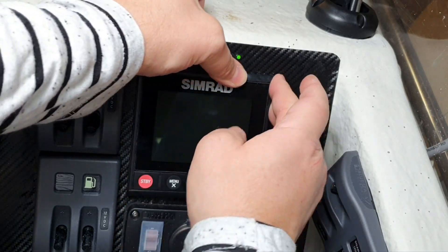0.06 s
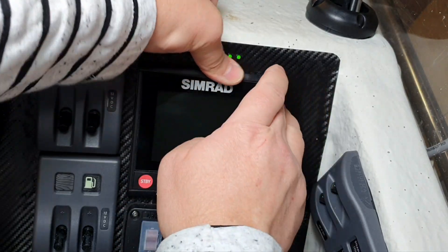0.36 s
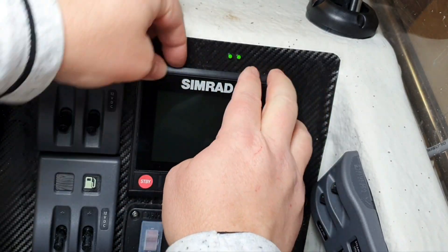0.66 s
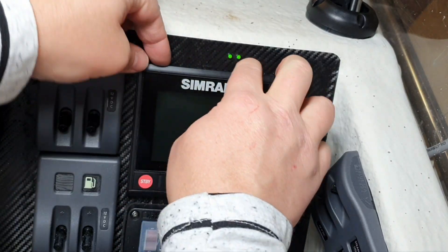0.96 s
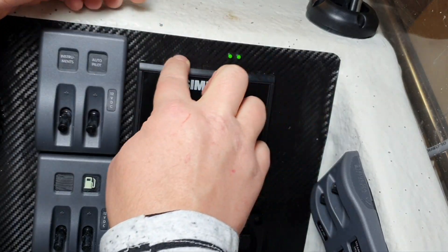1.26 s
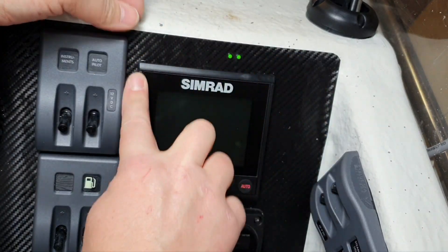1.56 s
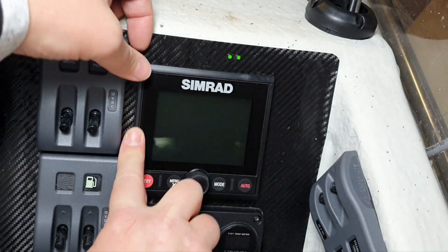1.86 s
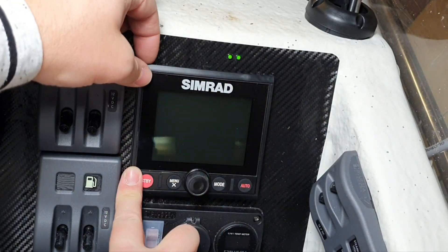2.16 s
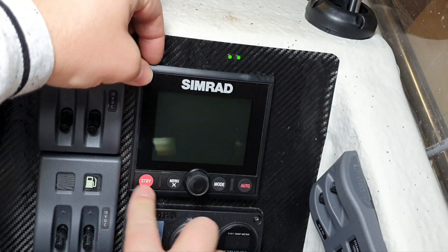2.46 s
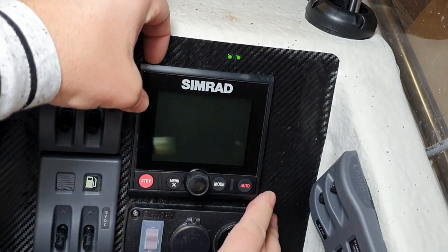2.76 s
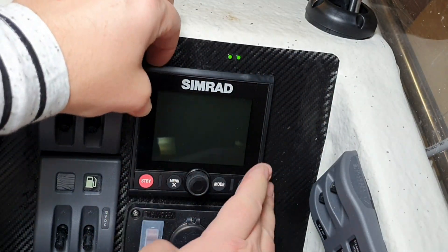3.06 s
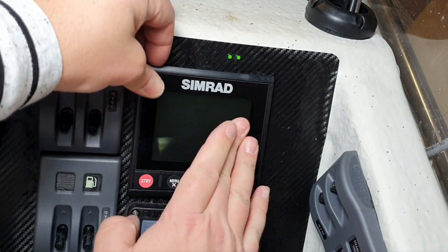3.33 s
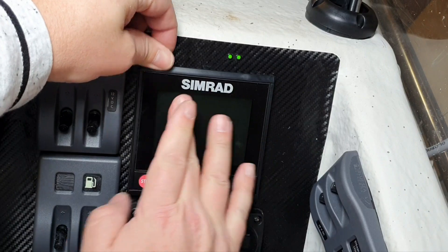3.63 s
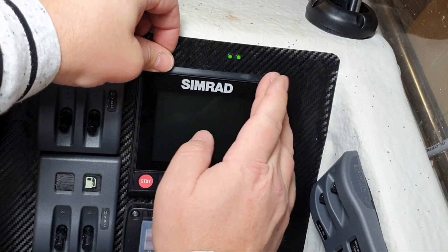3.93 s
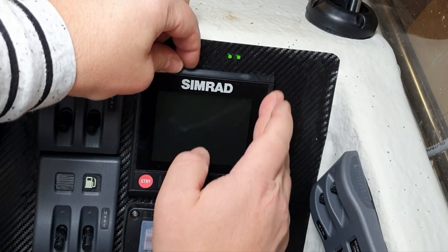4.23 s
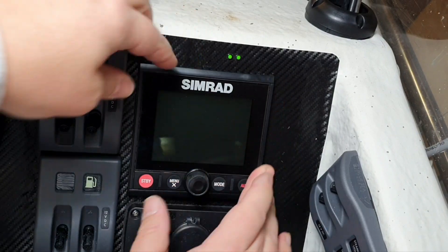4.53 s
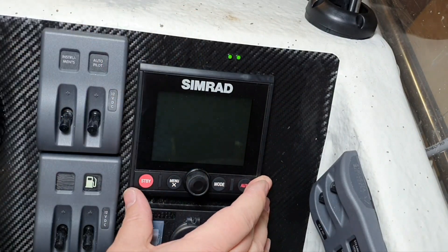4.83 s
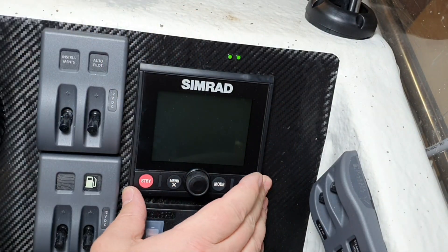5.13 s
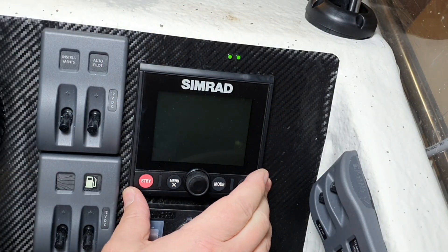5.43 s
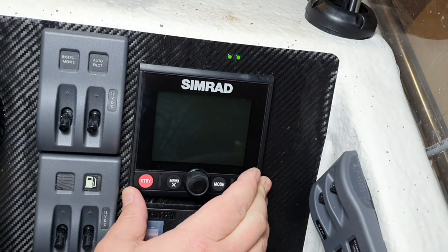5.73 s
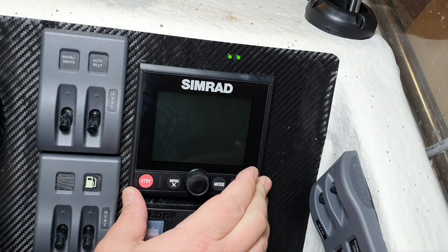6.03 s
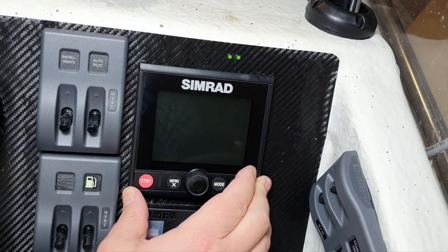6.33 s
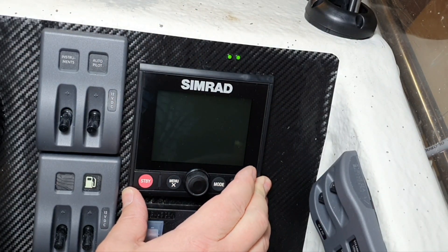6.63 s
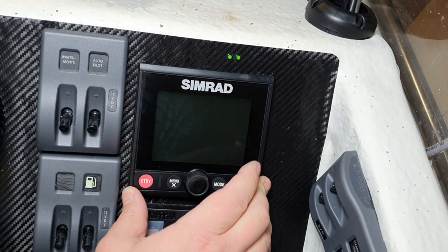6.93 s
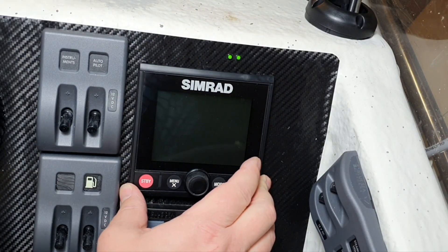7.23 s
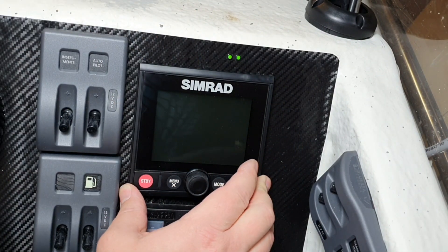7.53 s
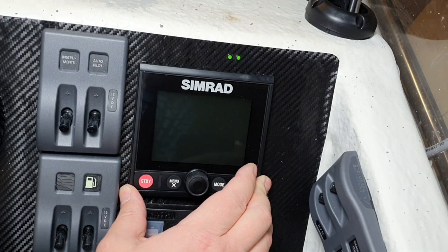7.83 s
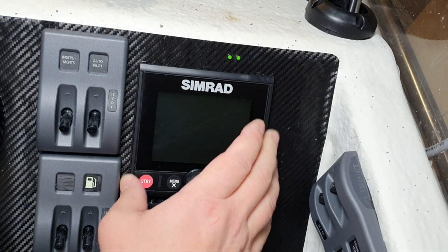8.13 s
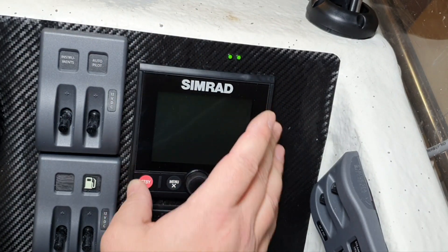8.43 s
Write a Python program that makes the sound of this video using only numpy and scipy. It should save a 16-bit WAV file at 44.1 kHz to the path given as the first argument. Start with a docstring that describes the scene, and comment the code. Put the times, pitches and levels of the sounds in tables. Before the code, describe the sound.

Hands brush and press a plastic display into a hollow console, with light taps, then clicks, creaks and dull thumps, close up.

```python
"""Hands press a plastic display into the dashboard of a boat, close up, in a quiet place.
First, fingers and sleeves brush the panel, with light taps and small clicks from the housing.
From about 3 s the hollow console thumps more firmly under the palms; near 6 s the grip tightens
and the housing clicks and creaks. A fingertip squeaks on the plastic at 7.5 s, then the hardest
push lands with a deep thump and the ping of a small metal part, and the hands ease off."""
import sys
import numpy as np
from scipy import signal
from scipy.fft import rfft, irfft
from scipy.io import wavfile
from scipy.ndimage import uniform_filter1d

SR = 44100
rng = np.random.default_rng(int(sys.argv[2]) if len(sys.argv) > 2 else 0)


def store_wav(level_fs):
    """Save 16-bit WAV to argv[1]."""
    pcm = np.round(np.clip(np.atleast_2d(level_fs), -1, 1) * 32767)
    wavfile.write(sys.argv[1], SR, pcm.T.astype(np.int16))


N = 374409

# Clicks and creaks under the grip:
# (time [s], strength [dB], brightness [dB/octave], clack over knock [dB], t60 [s])
CLICK_CUES = [(0.095, -59.5, 4, -11, 0.15), (.751, -67, 9, 19.5, 0.047), (.855, -59.5, 7, 2.5, 0.11),
              (1.002, -55.5, 2.5, 1, 0.086), (1.195, -55, 1.5, 3.5, 0.054), (1.228, -59.5, 6, 14.5, 0.1),
              (1.275, -54.5, 1, 6, 0.063), (2.411, -74.5, -1.5, 15, 0.035), (2.59, -54, 4.5, 5.5, 0.044),
              (3.038, -55.5, 3.5, 4.5, 0.071), (3.952, -76, 12, 24, 0.066), (4.482, -57, -2.5, 5, 0.033),
              (4.5, -54.5, -1.5, 5, .06), (4.64, -58.5, 2, 12, 0.081), (5.353, -54.5, 4, -8, 0.14),
              (5.374, -49, 4, -4.5, 0.082), (5.47, -64, 2.5, -11, 0.19), (5.55, -58.5, 2, -2, 0.071),
              (5.656, -47.5, -1, 1, 0.084), (5.713, -32.5, 1.5, -0.5, 0.053), (5.731, -40.5, -1, 6, 0.062),
              (5.781, -50.5, -3, -1, 0.052), (5.855, -56, -4, -4, 0.14), (6.049, -59.5, -3, 4, 0.053),
              (6.273, -50, 2, -8, 0.061), (6.401, -36, .5, 2.5, 0.12), (6.431, -34.5, 0, 3, 0.092),
              (6.477, -39.5, -0.5, 0, 0.084), (6.503, -52.5, 3.5, -7, 0.18), (6.647, -31, -2, 5.5, 0.04),
              (6.78, -48, -4.5, 2.5, 0.11), (6.83, -52, -0.5, 3.5, 0.27), (7.038, -36, -3.5, 3.5, 0.072),
              (7.069, -41.5, -5, 1, 0.091), (7.131, -44, -2, 1, 0.11), (7.195, -39.5, -1, -8, 0.075),
              (7.253, -57.5, 4, -10, 0.15), (7.493, -36, 2.5, -1, 0.088), (7.611, -40.5, 0.5, 0, 0.089),
              (7.671, -46.5, 4.5, 2.5, 0.15), (7.734, -43.5, -2.5, -1.5, 0.083),
              (7.767, -42.5, -1, 1, 0.14), (7.784, -40.5, -3, 0.5, 0.22), (7.815, -37, 0, 1.5, 0.23),
              (7.835, -35, 1.5, -7, .11), (7.853, -23, -1.5, 1, 0.093), (7.96, -30, 0.3, 2, 0.068),
              (8.046, -52.5, -2.5, 1.5, 0.084), (8.068, -48.5, -3.5, -1.5, 0.079),
              (8.193, -64.5, 4, -2.5, 0.21), (8.346, -53.5, -3.5, 5, 0.089)]
# Ring of the housing: (frequency [Hz], level [dB], t60 [s], pan left [dB], right-side lag [rad])
HOUSING_MODES = [(316.7, 1, 0.12, -15.5, 1.37), (421, 1, 0.14, -6, 0), (497, 0.5, 0.09, 16.5, 20.5),
                 (528.8, 12, 0.058, 3, 5), (573.4, 3.5, 0.076, -15, -1.5), (648.7, -6.5, 0.11, -19.5, -1.4),
                 (815, -27, 0.043, 5, 8), (867.6, 12, 0.065, 3, 4), (1023, -1, 0.032, -21.5, 2),
                 (1071, -12, 0.071, -31, -4), (1197, 9, 0.029, 2, -1.5), (1537, -19.5, 0.055, 25, -4),
                 (1780, 1.5, 0.018, 2.5, -2.5), (2112, -13.5, 0.049, 21, 6.5), (2380, -36, 0.21, -5, 13),
                 (3430, -4, 0.0073, 35, 13), (3987, -1.5, 0.02, 17, -7.5), (3830, -8, 0.015, -10, 10.5),
                 (4790, 3, 0.017, -15.5, -8.8), (6630, -43.5, 0.41, -47, -12), (8050, -37, 0.045, 0, -17)]
# Tone of one contact: (frequency [Hz], gain [dB])
CONTACT_EQ = [(200, -7.5), (700, -11), (1200, -14.5), (2000, 6), (2700, 5), (3350, 5), (4200, -5),
              (5000, -13.5), (6500, -16.5), (7600, -25.5), (9500, -22), (12500, -27), (14500, -38),
              (15700, -52)]
# Four bands of a click, named knock, clack, snap and tick: (low edge [Hz], high edge [Hz])
CLICK_BANDS = [(300, 700), (700, 1500), (1500, 5000), (5000, 15000)]
# Their balance in a neutral click: (level [dB]) per band
BAND_DB = [-0.5, -6, -9, -12.5]
# A contact near the rim trades the hollow knock for the clack: (share of clack [dB/dB]) per band
BAND_CLACK = [-0.66, 0.89, -0.1, -0.28]
# Pushes that thump the console: (time [s], peak [dB], pitch [Hz])
PUSH_CUES = [(.123, -46, 157), (1.234, -44.5, 183), (1.27, -43.5, 145), (1.334, -44.5, 162),
             (2.26, -52.5, 178), (2.445, -53.5, 149), (2.593, -42.5, 154), (2.903, -49, 136.6),
             (3.191, -37, 178), (3.221, -37.5, 159), (3.248, -32.5, 138.1), (3.791, -43.5, 186),
             (3.882, -42, 148.4), (4.128, -52.5, 159), (4.353, -50.5, 156.4), (4.49, -49, 198),
             (5.712, -38, 191), (5.859, -29, 212.6), (5.873, -29.5, 141.5), (5.945, -29, 169.5),
             (6.057, -35, 181.6), (6.273, -32.5, 213), (6.41, -26.5, 179), (6.468, -26.5, 131),
             (6.504, -29, 144), (6.651, -28, 138.6), (6.797, -30, 181.2), (6.843, -32.5, 177),
             (7.061, -30, 137.7), (7.146, -35, 162.3), (7.198, -22, 171.5), (7.261, -41, 187.4),
             (7.658, -33.5, 180.6), (7.785, -23, 169), (7.85, -17.5, 154.9), (7.862, -15, 176.2),
             (7.981, -40, 182), (8.188, -39, 156), (8.343, -38, 213)]
# Boom of the hollow console: (frequency [x pitch], level [dB], decay [x t60], pan left [dB])
CONSOLE_MODES = [(0.269, -13.5, 0.92, -9), (0.442, -12, 1.92, 8.5), (0.722, -6, 1.23, -0.5),
                 (0.998, 7.5, 0.54, 3.5), (1.123, -14, 2, 1), (1.849, -20, 1.34, 4),
                 (2.37, -11.5, 0.49, 8.5)]
# Skin sticking and slipping on plastic: (time [s], pitch [Hz], level [dB], length [s], rasp [0-1])
SQUEAK_CUES = [(0.109, 3650, -51.5, 0.029, 0.27), (.14, 2925, -48, 0.017, 0.3),
               (0.961, 993, -51, 0.038, 0.74), (0.984, 1078, -45.5, 0.031, 0.94),
               (6.267, 440, -37.5, 0.017, 0.1), (7.09, 442, -24.5, 0.017, 0.31),
               (7.48, 440, -31.5, 0.0063, 0.42), (7.488, 550, -28.5, 0.011, 0.37),
               (7.505, 827.5, -25, .03, 0.2), (7.532, 823, -29, 0.024, 0), (7.559, 808, -36, 0.011, 0)]
# Fingertips tapping and skipping on the display: (time [s], level [dB], pitch [Hz])
TAP_CUES = [(0.318, -43.5, 1120), (.361, -44, 874), (0.389, -45, 800), (0.42, -41, 890), (.46, -50, 800),
            (0.526, -42.5, 788), (.998, -41, 752), (1.013, -41, 1190), (1.186, -45.5, 695),
            (1.204, -45, 706), (3.224, -31.5, 969), (3.2477, -33.5, 1020), (3.258, -31.5, 972),
            (4.639, -48, 936), (4.655, -47, 834), (7.0385, -29, 793)]
# Display face, damped by the finger: (frequency [x pitch], level [dB], decay [x t60])
FACE_MODES = [(.62, -10, 0.72), (0.882, 3.5, 0.68), (0.997, 3.5, 1), (1.24, -5, 0.98), (1.6, -10.5, 0.33),
              (2.2, -13.5, 0.88), (3.4, -7.5, 0.19)]
# Pings of a small metal part: (time [s], pitch [Hz], level [dB], t60 [s])
PING_CUES = [(7.834, 9940, -44, 0.14), (7.892, 10010, -44.5, 0.054), (7.893, 5900, -58, 0.24)]
# Weight of the resting hands on the console: (time [s], rumble level [dB])
LEAN_CURVE = [(0.0, -58), (0.42, -66), (1.21, -70.5), (1.46, -73), (2.05, -80.5), (3.24, -64), (3.59, -69),
              (3.99, -73), (4.99, -73), (5.46, -76), (5.86, -56), (6.27, -58.5), (6.53, -64), (6.81, -69),
              (7.59, -54), (7.83, -45), (8.16, -73), (8.49, -61)]
# Dry skin dragging with a hollow note: (start [s], end [s], level [dB], pitch [Hz])
RUB_CUES = [(0.259, 0.603, -62, 317), (0.907, 1.035, -56.5, 1186), (1.384, 1.484, -67, 620),
            (1.415, 1.855, -66.5, 324), (1.491, 1.756, -76, 2210), (2.069, 2.32, -62.5, 938),
            (2.746, 2.877, -61.5, 1150), (2.882, 3.054, -64, 1080), (3.14, 3.355, -49.5, 160),
            (3.355, 3.674, -65, 1075), (4.185, 4.312, -66.5, 890), (5.363, 5.399, -48, 3660),
            (5.446, 5.522, -61.5, 670), (6.0, 6.199, -48.5, 194), (7.004, 7.051, -50.5, 510),
            (8.29, 8.374, -56.5, 1020)]
# Skin and sleeves brushing the panel: (start [s], end [s], hiss level [dB], grit over hiss [dB])
STROKE_CUES = [(0.002, .22, -64.5, 6), (0.247, 0.528, -75, 14), (0.55, 0.707, -65, 2.5),
               (0.715, 0.825, -70, 4), (0.856, 1.028, -79, 12.5), (1.144, 1.418, -69.5, 7),
               (1.51, 1.627, -70, -9), (1.61, 2.126, -73.5, 2), (2.06, 2.19, -64, 0),
               (2.16, 2.221, -70.5, 12.5), (2.454, 2.567, -79, -10), (2.597, 2.635, -73.5, 7.5),
               (2.77, 2.888, -69.5, 3.5), (2.885, 3.116, -89.5, 16.5), (3.116, 3.227, -77, 13),
               (3.192, 3.379, -68.5, 6), (3.441, 3.479, -63, -2), (3.684, 3.85, -67, 0),
               (3.877, 3.99, -72, -5), (4.133, 4.375, -82.5, 7), (4.346, 4.5, -66.5, 1.5),
               (4.51, 4.767, -68.5, 2), (5.378, 5.405, -62, 7.5), (5.625, 5.737, -62.5, -1),
               (5.72, 5.796, -63, 3.5), (5.854, 6.023, -79, 16.5), (5.974, 6.133, -65, -6),
               (6.137, 6.258, -73, -2), (6.277, 6.342, -55, -3), (6.377, 6.65, -59, -6),
               (6.643, 7.024, -74.5, 13), (7.022, 7.27, -66.5, 11), (7.247, 7.454, -60, -7),
               (7.42, 7.49, -68, 4), (7.483, 7.562, -62, 9), (7.664, 7.89, -53.5, 4),
               (8.284, 8.397, -61.5, 3)]
# Tones of palm rumble, fingertip rub, grit and sleeve hiss: (frequency [Hz], gain [dB])
PALM_EQ = [(24, -31), (40, 3.5), (70, -1), (110, -3), (170, -0.5), (220, -11), (265, -14.5), (320, -6),
           (430, -22), (700, -17.5), (1500, -59)]
FINGER_EQ = [(300, -18.5), (420, -10), (520, -27), (700, -4), (930, -4.5), (1180, -1.5), (1450, -18),
             (1750, -6), (2100, -15), (2700, -23), (6000, -65)]
GRIT_EQ = [(800, 1), (1500, -1.5), (1850, -2), (2120, 0.5), (2600, -2.5), (3300, 1.5), (3750, 4),
           (4500, 1.5), (6500, -14), (9000, -30)]
SLEEVE_EQ = [(1500, -38), (3000, 0.5), (4300, -5), (6200, 5), (7500, -2), (9500, 3), (12500, -1.5),
             (14500, -9.5), (15700, -25)]
# Tone of the microphone's self-noise, with a hump near 4 kHz: (frequency [Hz], gain [dB])
MIC_NOISE_EQ = [(24, -32), (45, -10.5), (190, -3), (280, -11.5), (450, -24), (650, -30.5), (1000, -24.5),
                (1500, -27), (3200, -29), (3850, -16), (4600, -25), (7200, -37.5), (12000, -36.5),
                (15500, -42)]
# Stereo image of the noise layers: (frequency [Hz], left-right correlation [-1 to 1])
STEREO_LIKENESS = [(40, 0.13), (80, 0.93), (120, 0.87), (190, 0.87), (280, 0.93), (450, 0.32), (650, -0.21),
                   (900, 0.36), (1150, -0.37), (1600, -0.017), (3000, -0.0067), (12000, -0.015)]


def housing_clicks(snap_db=-1, chatter_db=6, onset_s=0.0097, pivot_hz=1620):
    """Each contact is a snap and a dying chatter of small slips that ring the housing."""
    size, lead = 16384, 160  # samples; the lead leaves room for the attack
    t, hz = np.arange(size) / SR, np.fft.rfftfreq(size, 1 / SR)
    filters = [signal.butter(4, edges, "bandpass", fs=SR, output="sos") for edges in CLICK_BANDS]
    bands = [abs(signal.sosfreqz(sos, hz, fs=SR)[1]) for sos in filters]
    octaves = np.log2(np.array(CLICK_BANDS) / pivot_hz).mean(axis=1)
    onset_window = np.exp(-(t / onset_s) ** 4) / (onset_s * SR)
    out = np.zeros((2, N))
    for start, strength_db, brightness, clack_db, t60 in CLICK_CUES:
        softness = (t60 / 0.15) ** 2  # long creaks ease in, short clicks snap
        force = rng.standard_normal(size) * uneven_grip(size, chatter_db, grain_samples=60)
        force *= decay(t, t60) * (1 - np.exp(-t / (softness * 0.0021)))
        force[0] += gain_of(snap_db) * np.exp(-2 * softness) * np.linalg.norm(force)
        spectrum = rfft(force) * rfft(housing_ring(t)) * gain_of(curve_at(CONTACT_EQ, hz))
        # a hard contact favours the high bands, a soft one the low
        levels_db = strength_db + np.array(BAND_DB) + brightness * octaves
        levels_db += clack_db * np.array(BAND_CLACK)
        for band, db in zip(bands, levels_db):
            part = irfft(spectrum * band)
            onset_rms = np.sqrt(np.sum(np.mean(part ** 2, axis=0) * onset_window))
            part = np.roll(part, lead, axis=1)[:, :size // 2]
            add(out, start - lead / SR, gain_of(db) * part / onset_rms)
    return out * pan(0.4)


def housing_ring(t, dense_db=-6, dense_t60=0.059):
    """Struck plastic answers with clear modes over a short, dense wash."""
    modes = sum(gain_of(db) * pan(pan_db) * ring(t, hz, t60, lag)
                for hz, db, t60, pan_db, lag in HOUSING_MODES)
    dense = rng.standard_normal((2, len(t))) * decay(t, dense_t60)
    return unit_rms(modes) + gain_of(dense_db) * unit_rms(dense)


def console_thumps(t60=0.28, rise_s=0.0057, damping_s=0.3, detune=0.014):
    """A push swells the console's low modes; the hand's load shifts their pitch and damps them."""
    t, out = np.arange(SR // 2) / SR, np.zeros((2, N))
    envelope = (1 - np.exp(-(t / rise_s) ** 2)) * np.exp(-(t / damping_s) ** 2)
    for start, peak_db, hz in PUSH_CUES:
        shifts = 1 + detune * rng.standard_normal(len(CONSOLE_MODES))
        body = sum(gain_of(db) * pan(pan_db) * ring(t, hz * (1 + (ratio - 1) * shift), t60 * hold)
                   for (ratio, db, hold, pan_db), shift in zip(CONSOLE_MODES, shifts))
        body *= envelope
        add(out, start, gain_of(peak_db) * body / abs(body).max())
    return out


def skin_squeaks(octave_db=-15, lag_rad=1.0, jitter=0.28):
    """Each slip of the skin sings one short note; an uneven slip makes it rasp."""
    out = np.zeros((2, N))
    for start, hz, db, length, rasp in SQUEAK_CUES:
        t = np.arange(0, length, 1 / SR)
        wander = unit_rms(uniform_filter1d(rng.standard_normal(SR), size=30))[:len(t)]
        pitch = hz * (1 + jitter * rasp * wander)
        phase = 2 * np.pi * np.cumsum(pitch) / SR - np.array([[0], [lag_rad]])
        note = np.sin(phase) + gain_of(octave_db) * np.sin(2 * phase)
        add(out, start, gain_of(db) * np.sin(np.pi * t / length) * note)
    return out * pan(5)


def fingertip_taps(t60=0.055, rise_s=0.00077, detune=0.092, lag_rad=1.64):
    """A fingertip lands softly, rings the display and damps it at once."""
    t, out = np.arange(SR // 6) / SR, np.zeros((2, N))
    for start, db, hz in TAP_CUES:
        shifts = 1 + detune * rng.standard_normal(len(FACE_MODES))
        face = sum(gain_of(mode_db) * ring(t, hz * ratio * shift, t60 * hold, lag_rad)
                   for (ratio, mode_db, hold), shift in zip(FACE_MODES, shifts))
        face *= 1 - np.exp(-t / rise_s)
        add(out, start, gain_of(db) * face / abs(face).max())
    return out * pan(8)


def metal_pings():
    """The hardest push shakes a small metal part into thin, high rings."""
    t, out = np.arange(SR // 3) / SR, np.zeros((2, N))
    for start, hz, db, t60 in PING_CUES:
        add(out, start, gain_of(db) * ring(t, hz, t60))
    return out * pan(-9)


def palm_drag(drag_db=-19.5, rise_db_per_s=223, fall_db_per_s=166):
    """Palms rumble on the console and fingertips rub the textured panel, most around each push."""
    t, drag = np.linspace(0, N / SR, 4000), 0
    for push_s, peak_db, _ in PUSH_CUES:
        fade_db = np.maximum((push_s - t) * rise_db_per_s, (t - push_s) * fall_db_per_s)
        drag += gain_of(peak_db + drag_db - fade_db) ** 2
    lean = gain_of(np.interp(t, *np.transpose(LEAN_CURVE))) ** 2
    return (friction(lean + drag, PALM_EQ, db=5, pan_db=-0.5, grain_db=4, grain_samples=600)
            + friction(drag, FINGER_EQ, db=-13.5, pan_db=2, grain_db=1, grain_samples=400))


def skin_rubs(relative_width=0.25, right_delay_s=0.0003):
    """Slips of dry skin feed one broad resonance that swells and fades with the drag."""
    freqs, out = np.fft.fftfreq(SR, 1 / SR), np.zeros((2, N))
    for start, end, db, hz in RUB_CUES:
        t = np.arange(0, end - start, 1 / SR)
        slips = rng.standard_normal(SR) * uneven_grip(SR, depth_db=3, grain_samples=400)
        resonance = 1 / (1 + 1j * (freqs / hz - 1) / (relative_width / 2)) ** 2
        note = np.fft.ifft(np.fft.fft(slips) * resonance)[:len(t)]
        stereo = (note * np.exp(-2j * np.pi * hz * np.array([[0], [right_delay_s]]))).real
        add(out, start, gain_of(db) * unit_rms(stereo) * np.sin(np.pi * t / (end - start)))
    return out * pan(8)


def sleeve_brushes(attack_s=0.017, release_s=0.032, taper_db=3):
    """A fine hiss swells and tapers with the hand's speed; pressure adds grit and fingertip rub."""
    t, hiss, grit = np.linspace(0, N / SR, 4000), 0, 0
    for start, end, hiss_db, grit_db in STROKE_CUES:
        touch = (1 + np.tanh((t - start) / attack_s)) * (1 + np.tanh((end - t) / release_s)) / 4
        speed = np.sin(np.interp(t, [start, end], [0, np.pi]))
        power = touch * gain_of(hiss_db - taper_db * (1.5 - speed)) ** 2
        hiss += power
        grit += power * gain_of(grit_db) ** 2
    return (friction(hiss, SLEEVE_EQ, db=0.5, pan_db=1.5, grain_db=1.3, grain_samples=50)
            + friction(grit, GRIT_EQ, db=1.5, pan_db=6, grain_db=1.5, grain_samples=120)
            + friction(grit, FINGER_EQ, db=-4.5, pan_db=6, grain_db=3, grain_samples=400))


def friction(power, eq, db, pan_db, grain_db, grain_samples):
    """Tiny slips blur into grainy noise that rides the power curve of the sliding hand."""
    envelope_db = np.interp(np.linspace(0, 1, N), np.linspace(0, 1, len(power)),
                            10 * np.log10(power + 1e-12))
    slips = rng.standard_normal((2, N)) * uneven_grip(N, grain_db, grain_samples)
    return gain_of(db + envelope_db) * pan(pan_db) * coloured(wandering_contact(slips), eq)


def uneven_grip(length, depth_db, grain_samples):
    """The grip catches and lets go: a gain that flutters at random."""
    flutter = unit_rms(uniform_filter1d(rng.standard_normal(length), grain_samples))
    return gain_of(depth_db * np.clip(flutter, -2.5, 2.5))


def wandering_contact(x, depth_db=2.5):
    """Patches of the spectrum swell and fade as the contact wanders over the surface."""
    spectra = signal.stft(x, nperseg=512)[2]
    patch = np.outer(np.hanning(7), np.hanning(28))  # frequency bins by time frames
    swells = unit_rms(signal.fftconvolve(rng.standard_normal(spectra.shape[1:]), patch, "same"))
    return signal.istft(spectra * gain_of(depth_db * swells))[1][:, :N]


def helm_echo(x, wet_db=-20, dull_t60=0.25, bright_t60=0.2, dull_hz=4500):
    """The surfaces around the helm throw back a faint, dull echo."""
    t = np.arange(SR // 2) / SR
    reflections = rng.standard_normal((2, len(t))) * (1 - np.exp(-t / 0.0055))
    dull = signal.sosfilt(signal.butter(2, dull_hz, fs=SR, output="sos"), reflections)
    tail = dull * decay(t, dull_t60) + 0.066 * reflections * decay(t, bright_t60)
    return gain_of(wet_db) * signal.fftconvolve(x, tail / np.linalg.norm(tail[0]), axes=1)[:, :N]


def mic_noise(db=-70):
    """The microphone's steady low rumble and faint hiss."""
    return gain_of(db) * pan(5.5) * coloured(rng.standard_normal((2, N)), MIC_NOISE_EQ)


def coloured(noise, eq):
    """Shapes stereo noise with an EQ: nearly centred in the bass, wide in the treble."""
    hz = np.fft.rfftfreq(N, 1 / SR)
    left, other = rfft(noise)
    likeness = np.clip(curve_at(STEREO_LIKENESS, hz), -1, 1)
    right = likeness * left + np.sqrt(1 - likeness ** 2) * other
    return unit_rms(irfft(np.array([left, right]) * gain_of(curve_at(eq, hz)), N))


def ring(t, hz, t60, lag_rad=0):
    """One dying mode in stereo, with a phase lag on the right."""
    return decay(t, t60) * np.sin(2 * np.pi * hz * t - np.array([[0], [lag_rad]]))


def decay(t, t60):
    """A fade of 60 dB every t60 seconds."""
    return gain_of(-60 * t / t60)


def gain_of(db):
    """Decibels to gain."""
    return 10 ** (np.asarray(db) / 20)


def unit_rms(x):
    """Scales to rms 1."""
    return x / np.sqrt(np.mean(x ** 2) + 1e-20)


def curve_at(points, hz):
    """Reads a curve on a log-frequency axis."""
    freqs, values = np.transpose(points)
    return np.interp(np.log(hz + 1), np.log(freqs + 1), values)


def pan(left_db):
    """Stereo gains that put the left side left_db above the right."""
    return gain_of(np.array([[.5], [-.5]]) * left_db)


def add(mix, start_s, sound):
    """Drops a stereo sound into the mix at its cue."""
    part = mix[:, max(round(start_s * SR), 0):][:, :sound.shape[1]]
    part += sound[:, :part.shape[1]]


def scene():
    """The contacts and their echo up front, over the rubbing and the microphone's self-noise."""
    contacts = housing_clicks() + fingertip_taps() + console_thumps() + skin_squeaks() + metal_pings()
    floor = mic_noise()
    return contacts + helm_echo(contacts) + palm_drag() + skin_rubs() + sleeve_brushes() + floor


def record(dry, cutoff_hz=15700):
    """A steep low-pass trims the very top of the mix."""
    lowpass = signal.firwin(511, cutoff_hz, window=("kaiser", 9), fs=SR)
    return signal.oaconvolve(dry, lowpass[None], "same")


dry = scene()
out = record(dry)
store_wav(out)
```